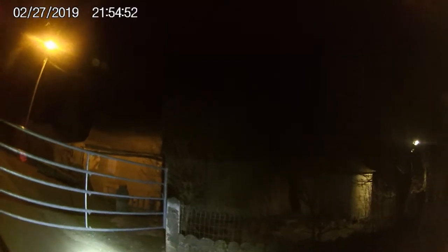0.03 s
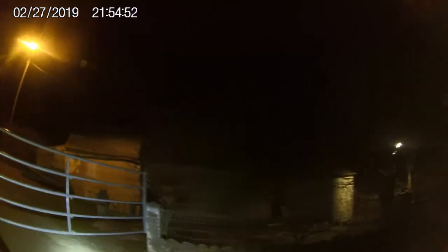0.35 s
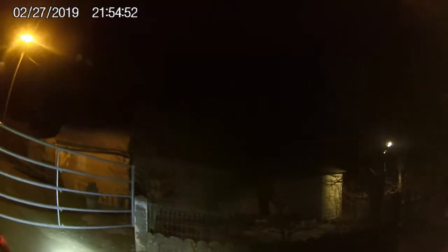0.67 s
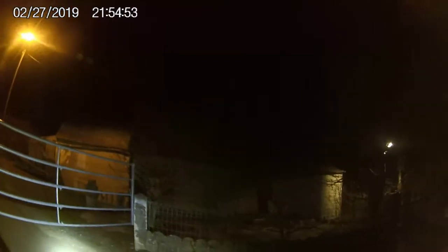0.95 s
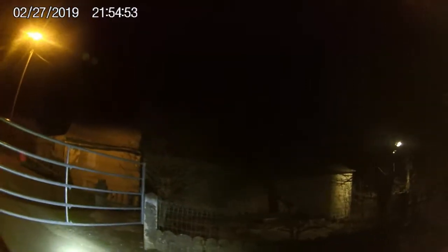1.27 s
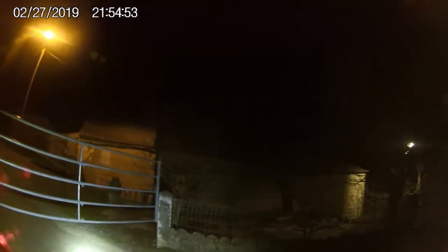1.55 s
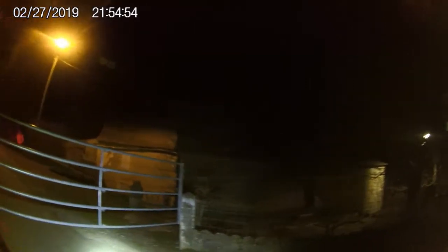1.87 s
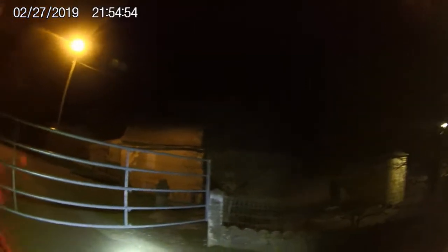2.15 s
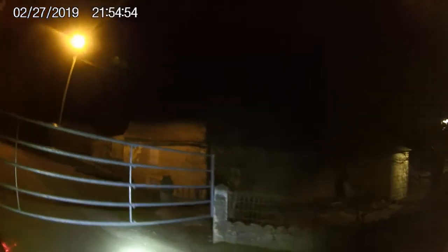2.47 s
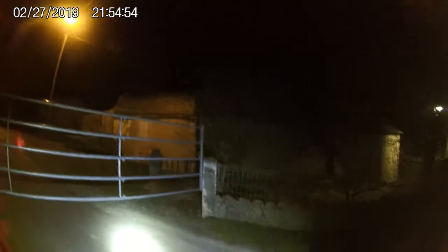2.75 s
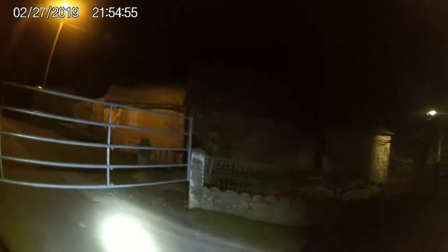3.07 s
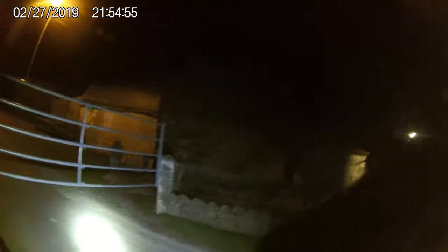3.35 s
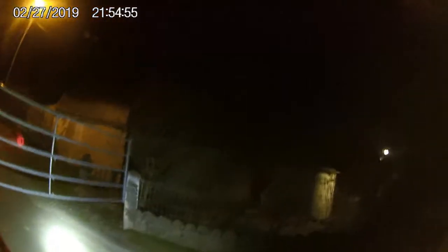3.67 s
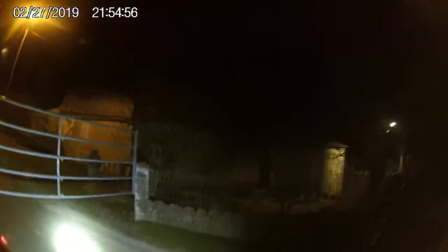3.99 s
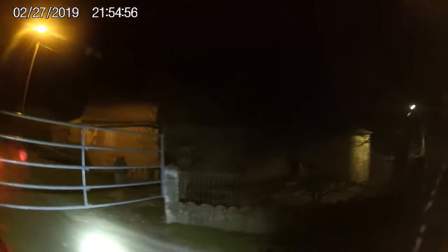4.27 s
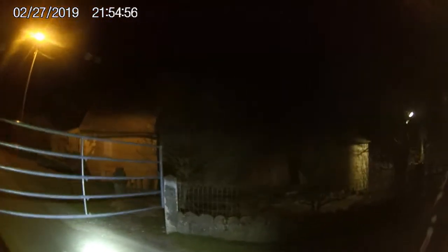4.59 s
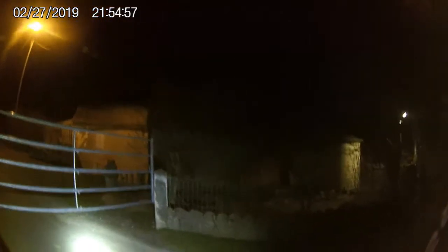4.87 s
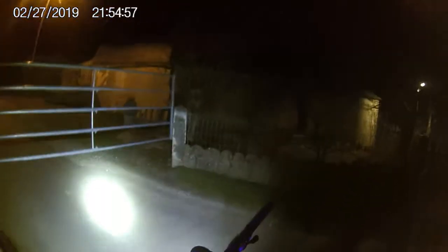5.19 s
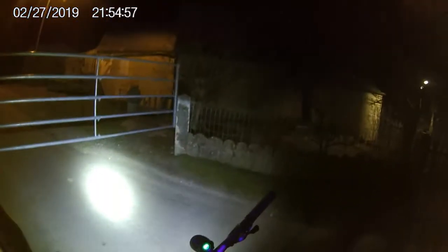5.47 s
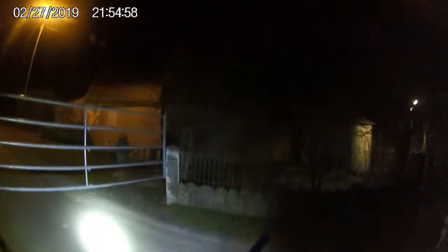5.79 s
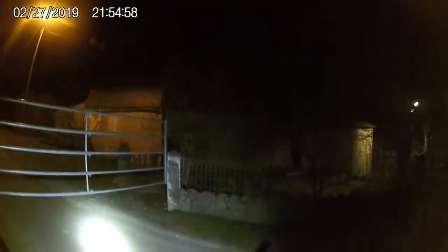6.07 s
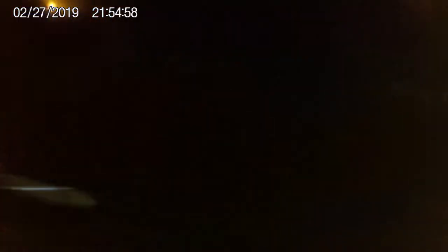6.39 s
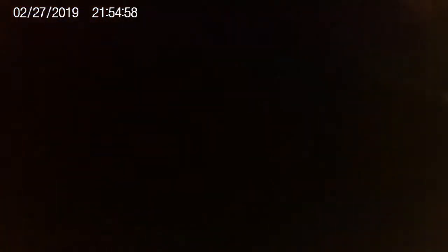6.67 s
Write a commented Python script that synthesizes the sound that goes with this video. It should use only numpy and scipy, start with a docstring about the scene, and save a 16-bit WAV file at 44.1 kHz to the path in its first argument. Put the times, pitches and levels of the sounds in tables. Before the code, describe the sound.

Fingers brush softly against a camera's plastic housing, with near quiet and faint hiss between touches. About halfway through, the handling turns much louder: uneven, boxy rubbing, clusters of sharp clicks, brief scrapes and soft thuds as the hand shifts. After a short lull come a few more clicks and a last rub. Everything reaches the microphone directly through the case, and the night outdoors stays silent.

```python
"""Outdoors on a still night, a small camera is handled. Light rustling against its case gives way to
close stick-slip rubbing, plastic clicks and a few hard scrapes as the grip shifts. The sound is
structure-borne: it reaches the microphone through the housing, which resonates near 1.3 kHz and
passes little above 4 kHz. Under it lie a faint hiss and a thin electronic whine."""
import sys
import numpy as np
from scipy import signal
from scipy.fft import rfft, irfft
from scipy.io import wavfile
from scipy.ndimage import uniform_filter1d, minimum_filter1d

SR = 44100
rng = np.random.default_rng(int(sys.argv[2]) if len(sys.argv) > 2 else 0)


def wrap_up_sound(samples):
    """Save the sound to the file named by the first command line argument, as 16-bit audio."""
    columns = np.atleast_2d(samples).T
    # keep every value between -1 and 1, then stretch to whole-number steps
    tamed = np.clip(columns, -1, 1)
    steps = np.round(tamed * 32767).astype(np.int16)
    wavfile.write(sys.argv[1], SR, steps)


N = 301644
TIME = np.arange(N) / SR

# impacts on the case: (time [s], level over 5 ms [dB], brightness [dB], bass [dB], rattle scale [s])
IMPACTS = [(0.0503, -43, 2, -46, .0004), (0.715, -52, -10, -13, .001), (2.081, -41.5, -1, -47, 0.0018),
           (2.1356, -31.5, -8, -60, 0.00017), (2.1932, -42, -4.5, -52, 0.00017),
           (2.2171, -40, -5, -53, 0.0041), (2.5877, -47, -4.5, -44, 0.00085),
           (2.6753, -35, -8, -50, 0.00014), (3.3529, -23, -3, -20.5, 0.00042),
           (3.3556, -19, -0.5, -25, 0.0007), (3.3728, -19.5, -7.5, -25, 0.00061),
           (3.428, -29, -5.5, -15.5, 0.0039), (3.5779, -29.5, 3, -22.5, 0.00038),
           (3.638, -17.5, -9.5, -13.5, 0.00056), (3.7375, -19, -9, -27.5, 0.00061),
           (3.9486, -23, -4.5, -24, 0.0008), (4.1046, -23, -9.5, -23, 0.0014),
           (4.1222, -27.5, -9.5, -20, 0.00089), (4.2073, -28.5, -7.5, -16.5, 0.001),
           (4.2843, -36.5, -12, -15.5, 0.0018), (4.4348, -22.5, -11, -23.5, 0.00047),
           (4.4415, -29.5, -7, -25.5, 0.0026), (4.5202, -34.5, 0.5, -17, 0.0022),
           (4.6381, -32, 4.5, -38, 0.01), (4.6493, -24.5, 7, -27.5, 0.00038),
           (4.6795, -16, -2.5, -21.5, 0.00085), (4.6842, -21, -7.5, -18, 0.00072),
           (4.8098, -13, -2.5, -20.5, 0.0013), (4.9489, -24.5, -10.5, -37, 0.00042),
           (5.0378, -13.5, -10.5, -38, 0.0015), (5.062, -22, 5.5, -19, 0.0015),
           (5.0664, -5.5, -4, -16, 0.0016), (5.1084, -19, -4, -23.5, 0.0008),
           (5.1695, -27, -11, -19, 0.00079), (5.194, -17, -9, -18, 0.00084),
           (5.2364, -34.5, -15, -20, 0.00039), (5.365, -40.5, 0, -30.5, 0.00074),
           (5.3832, -19, -4, -37, 0.00051), (5.5157, -22.5, -5, -19.5, 0.0021),
           (5.5669, -18.5, 7, -20, 0.00047), (5.5703, -21, -2, -14.5, 0.0012),
           (5.58, -23, -3, -29, 0.00063), (5.5922, -23, -11, -24.5, 0.0022),
           (5.6798, -19, -9.5, -20, 0.001), (5.7264, -25, -11, -14.5, 0.0011),
           (5.7512, -26.5, -6.5, -21.5, 0.00072), (5.8246, -24, 2, -28.5, 0.0011),
           (6.0963, -34.5, -8.5, -36, .0004), (6.296, -16.5, -8.5, -22, 0.0012),
           (6.629, -35, 1, -20, 0.0019), (6.66, -28.5, -9, -34, 0.001),
           (6.7224, -35.5, -0.5, -15.5, 0.0014), (6.772, -33.5, -4, -21.5, 0.0001),
           (6.7978, -16.5, -6, -31, 0.00085)]
# treble that leaks through the case: (frequency [Hz], relative level [dB])
LEAK_SPECTRUM = [(3000, -34.5), (5000, -2.5), (6100, -14.5), (7200, -10.5), (8000, -21.5), (9200, -8),
                 (11200, -0.5), (12500, -5.5), (13300, -16), (14600, -6), (16000, -18.5)]


def amp(db):
    """Amplitude ratio of a level in decibels."""
    return 10 ** (np.asarray(db) / 20)


def unit(x):
    """Normalisation to rms 1."""
    return x / np.sqrt(np.mean(x ** 2) + 1e-20)


def add(mix, time_s, sound):
    """Superposition: a sound joins the mix at the given time."""
    part = mix[max(round(time_s * SR), 0):][:len(sound)]
    part += sound[:len(part)]


def wander(cutoff_hz):
    """Random modulation: low-passed Gaussian noise of rms 1."""
    spectrum = rfft(rng.standard_normal(N))
    return unit(irfft(spectrum / (1 + (np.fft.rfftfreq(N, 1 / SR) / cutoff_hz) ** 4), N))


def impulse_response(spectrum, weight=lambda hz: 1, size=2048):
    """Minimum-phase response of energy 1: the Hilbert transform gives phase from log magnitude."""
    hz = abs(np.fft.fftfreq(size, 1 / SR)) + 1
    points_hz, points_db = np.transpose(spectrum)
    gain = amp(np.interp(np.log(hz), np.log(points_hz), points_db)) * weight(hz)
    gain /= np.sqrt(1 + (hz / points_hz[-1]) ** 20)
    log_gain = np.log(np.maximum(gain / gain.max(), 1e-5))
    transfer = np.exp(np.conj(signal.hilbert(log_gain)))
    response = np.fft.ifft(transfer).real[:size // 2]
    return response / np.linalg.norm(response)


def housing(spectrum, tilt=0, flex_hz=470, panel_hz=1020, wall_hz=2050):
    """Structure-borne transmission in four bands: slow flexing, broad panels, air cavity, stiff walls."""
    below = lambda hz, edge: 1 / np.sqrt(1 + (hz / edge) ** 12)
    flex = lambda hz: below(hz, flex_hz)
    panel = lambda hz: below(flex_hz, hz) * below(hz, panel_hz) ** 2
    cavity = lambda hz: below(panel_hz, hz) * below(hz, wall_hz)
    walls = lambda hz: below(wall_hz, hz) * np.clip(hz / wall_hz, 1, 2) ** tilt
    return [impulse_response(spectrum, band) for band in (flex, panel, cavity, walls)]


def transmit(drive, response):
    """Linear filtering: a drive convolved with an impulse response, brought to rms 1."""
    return unit(signal.oaconvolve(drive, response)[:N])


def hiss_and_whine(hiss_db=-62, whine_db=-87.5, whine_hz=10020, waver_hz=35):
    """Noise floor: hiss coloured by the housing, and a frequency-modulated electronic tone."""
    # steady hiss: (frequency [Hz], relative level [dB])
    hiss_spectrum = [(30, -23.5), (400, -23.5), (1000, -11.5), (1300, 0.5), (1600, -3), (2950, -4),
                     (3600, -13), (5100, -28.5), (6000, -48.5), (8300, -43), (9600, -32.5), (11500, -32),
                     (14500, -31.5), (16000, -43)]
    pitch_hz = whine_hz + waver_hz * wander(70)
    whine = np.sqrt(2) * np.sin(2 * np.pi * np.cumsum(pitch_hz) / SR)
    hiss = transmit(rng.standard_normal(N), impulse_response(hiss_spectrum))
    return amp(hiss_db) * hiss + amp(whine_db) * whine


def thuds(half_width_cycles=0.38):
    """Elastic flexure: a push bends the case in and lets it back, in little more than one low cycle."""
    # soft pushes: (centre time [s], peak level [dB], frequency [Hz])
    pushes = [(.04, -56, 240), (.134, -54, 200), (3.359, -33.5, 82), (4.112, -41.5, 126),
              (4.728, -40.5, 133), (4.814, -41.5, 80.4), (5.071, -28, 171), (5.542, -48, 159),
              (6.477, -44.5, 132)]
    out, t = np.zeros(N), np.arange(-.025, .025, 1 / SR)
    for centre, db, hz in pushes:
        envelope = np.exp(-(t * hz / half_width_cycles) ** 2)
        add(out, centre + t[0], -amp(db) * np.cos(2 * np.pi * hz * t) * envelope)
    return out


def squeaks(jitter=0.082):
    """Stick-slip oscillation: plastic slips almost periodically for a few milliseconds."""
    # squeaks: (centre time [s], peak level [dB], frequency [Hz], half width [s])
    bursts = [(3.3606, -20.5, 2980, 0.0038), (3.361, -26, 4130, 0.001), (3.37, -34, 4120, 0.002),
              (5.0643, -11, 3830, 0.0028)]
    out = np.zeros(N)
    uneven_time = np.cumsum(1 + jitter * wander(590)) / SR
    for centre, db, hz, half_width in bursts:
        envelope = np.exp(-((TIME - centre) / half_width) ** 2)
        out += amp(db) * np.sin(2 * np.pi * hz * uneven_time) * envelope
    return out


def scrapes():
    """Broadband friction: very fast slips of hard edges bite at once, ease off and leak in as treble."""
    # scraping edges: (time [s], initial level [dB], decay time [s])
    edges = [(3.359, -44, 0.0023), (3.369, -47, 0.0025), (4.646, -58.5, 0.0064), (4.683, -57, .0018),
             (4.8113, -45.5, 0.0016), (5.02, -71, .014), (5.064, -34.5, 0.0045), (5.5664, -54.5, 0.0046),
             (6.057, -78, .033), (6.214, -78.5, .14), (6.638, -52, 0.0019)]
    force = np.zeros(N)
    for start, db, decay in edges:
        age = np.arange(0, 2, 1 / max(decay * SR, 8))  # in decay times
        add(force, start, amp(db) * rng.standard_normal(len(age)) * np.exp(-age ** 2))
    return signal.oaconvolve(force, impulse_response(LEAK_SPECTRUM))[:N]


def contact(ease_s=0.024, stroke_skew=0.79, slide_db=-24.5, rise_s=0.0055, fall_s=0.012):
    """Incoherent sources add in power: the rubbing's level, brightness and bass over time, in dB."""
    # the hand rests on the case and drags lightly: (start [s], end [s])
    holds = [(3.348, 5.13), (5.57, 5.75), (6.05, 6.68)]
    # strokes across the case: (start [s], duration [s], level [dB], brightness [dB], bass [dB])
    strokes = [(-0.06, 0.31, -53.5, 0, -14.5), (0.273, 0.19, -53.5, -6, -17), (0.445, 0.21, -59, -3, -24),
               (1.55, 0.69, -54.5, -5, -18.5), (1.73, .12, -52.5, -9, -24), (1.862, 0.2, -39.5, -7, -25.5),
               (2.037, 0.23, -54, 4, -32), (2.267, 0.21, -42, -2, -22), (2.597, 0.2, -49, 1.5, -49),
               (2.813, 0.26, -55.5, 0, -22), (3.114, 0.2, -55, 0, -18), (3.438, 0.26, -34.5, 1.5, -29),
               (3.671, 0.14, -42, -1.5, -22.5), (3.802, 0.1, -42, -3, -24.5), (3.918, 0.18, -38, -3.5, -28),
               (4.075, 0.18, -36.5, -2.5, -32), (4.22, 0.66, -46, -31, -22.5),
               (4.472, 0.087, -42, 4.5, -21), (4.706, 0.3, -48.5, -13, -11), (4.952, 0.22, -36, 4.5, -27),
               (5.013, 0.023, -27.5, -1.5, -11), (5.167, 0.11, -40.5, -1.5, -23.5),
               (5.245, 0.15, -59, -1.5, -18), (5.56, .13, -49, 3.5, -19), (5.75, 0.17, -43.5, 1, -31.5),
               (5.892, .1, -46.5, 3, -30), (5.97, 0.16, -57, -3, -29), (6.051, 0.067, -39, 0.5, -33),
               (6.11, 0.076, -49, 1, -33), (6.2, 0.34, -43, -1.5, -38), (6.265, 0.14, -37, -1, -41.5),
               (6.51, .16, -44.5, 3, -14), (6.687, 0.16, -58, -6, -11), (6.807, 0.16, -26, -1, -40)]
    band_power = lambda db, bright, bass: amp([[db], [db + bright], [db + bass]]) ** 2
    brushing = band_power(db=-71, bright=-0.5, bass=-15.5)  # faint and unbroken
    held = sum((TIME > start) & (TIME < end) for start, end in holds).astype(float)
    held = uniform_filter1d(held, round(ease_s * SR))
    power = brushing + band_power(db=-50, bright=-0.5, bass=-22) * held ** 2
    for start, duration, db, bright, bass in strokes:
        during = (TIME > start) & (TIME < start + duration)
        progress = (TIME[during] - start) / duration
        arch = abs(np.sin(np.pi * progress ** stroke_skew)) ** 0.99  # peaks a little early
        power[:, during] += band_power(db, bright, bass) * arch ** 2
    for time_s, db, bright, _, _ in IMPACTS:  # the grip slides briefly around each knock
        near = (TIME > time_s - 2 * rise_s) & (TIME < time_s + 2 * fall_s)
        age = (TIME[near] - time_s) / np.where(TIME[near] < time_s, rise_s, fall_s)
        power[:, near] += band_power(db + slide_db, bright, bass=-16) * np.exp(-2 * age ** 2)
    level, treble, low = 10 * np.log10(power)
    return level, treble - level, low - level


def friction(slips_per_s, spread_db, drag, judder_db):
    """Stick-slip friction: tiny uneven slips over a smooth drag, swelling as the contact judders."""
    sizes = amp(spread_db * np.minimum(rng.exponential(1, N), 4)) * rng.choice([-1, 1], N)
    slips = unit(sizes * (rng.random(N) < slips_per_s / SR))
    return (slips + drag * rng.standard_normal(N)) * amp(judder_db * wander(44))


def rubbing(level, bright, bass, grip_s=3.32, leak_db=-44):
    """Forced vibration: friction drives the case, in a light rustle and, once gripped, a firm rub."""
    # the housing under a light touch: (frequency [Hz], relative level [dB])
    rustle_spectrum = [(30, -36.5), (250, -22), (480, -31), (780, -4), (1050, -15), (1300, 10), (1600, 6),
                       (2150, -13.5), (2550, -15), (2900, -10.5), (3250, -21.5), (3600, -17), (3950, -36.5),
                       (5800, -65)]
    # the housing under a firm grip: (frequency [Hz], relative level [dB])
    rub_spectrum = [(30, -27.5), (430, -33), (680, -16.5), (1020, -16), (1320, 7), (1600, 0.5), (1900, 3),
                    (2500, -7.5), (2950, -6.5), (3300, -15), (3600, -15.5), (4400, -33), (5200, -44),
                    (6100, -63.5)]
    uneven_db = 2.1 * wander(65)  # the case flexes unevenly
    flex_db, panel_db = bass - 4 + uneven_db, 0.41 * bass - 10.5 + uneven_db
    bands_db = flex_db, panel_db, 1.3, bright
    light = friction(slips_per_s=500, spread_db=2.0, drag=1.21, judder_db=3.0)
    firm = friction(slips_per_s=900, spread_db=4.0, drag=0.96, judder_db=2.0)
    out = np.zeros(N)
    for db, soft, hard in zip(bands_db, housing(rustle_spectrum), housing(rub_spectrum)):
        out += amp(level + db) * np.where(TIME < grip_s, transmit(light, soft), transmit(firm, hard))
    return out + amp(level + bright + leak_db) * transmit(firm, impulse_response(LEAK_SPECTRUM))


def ticks(rub_db, count=50, offset_db=-0.5, spread_db=6, bright_db=-9, bass_db=-22.5, rattle_s=0.0013):
    """Frictional catching: rows of small random impacts, about as strong as the rubbing behind them."""
    rows = []
    for position, size in rng.random((count, 2)):
        sample = position * (N - 1)
        level = rub_db[int(sample)] + offset_db + spread_db * (2 * size - 1)
        rows.append((sample / SR, level, bright_db, bass_db, rattle_s))
    return rows


def knocks(impacts, rattle_gain=1.51, hardening=0.081):
    """Impact excitation: a sharp contact and a short rattle set the case's damped modes ringing."""
    # the housing when struck: (frequency [Hz], relative level [dB])
    knock_spectrum = [(30, -32), (250, -22), (400, -26), (720, -10.5), (1000, -13), (1350, 1.5), (1720, -3),
                      (2150, -8.5), (2900, -4.5), (3250, -16.5), (3750, -19.5), (4400, -38.5), (5100, -42),
                      (5800, -60)]
    # modes of the case: (frequency [Hz], relative level [dB], time to fall 60 dB [s])
    case_modes = [(1326, -44, 0.028), (1418, -40, 0.019), (1748, -39.5, 0.022)]
    level_span = round(.005 * SR)
    out, t = np.zeros(N), np.arange(2048) / SR
    for time_s, level, bright, bass, rattle_s in impacts:
        # a harder contact reaches higher into the walls' range
        flex, panel, cavity, walls = housing(knock_spectrum, tilt=hardening * (bright + 4))
        chatter = rng.standard_normal(len(t)) * (rng.random(len(t)) < .25)
        envelope = np.exp(-(t / (2.58 * rattle_s)) ** 4)
        force = rattle_gain * np.sqrt(rattle_s / 0.0065) * chatter * envelope
        force[0] = 1  # the first contact
        shift_hz = rng.uniform(-89.6, 65.6)  # the grip detunes the modes
        modes = sum(amp(db - 60 * t / t60) * np.cos(2 * np.pi * (hz + shift_hz) * t)
                    for hz, db, t60 in case_modes)
        ringing = signal.fftconvolve(cavity, modes)
        ringing[:len(cavity)] += cavity
        # a light tick leaves the panels nearly still; a heavy knock sets them going
        for response, db in (flex, bass - 4.5), (panel, 0.95 * bass + 3), (ringing, 0.07), (walls, bright):
            band = signal.fftconvolve(force, response)
            add(out, time_s, amp(level + db) * band * np.sqrt(level_span / np.sum(band ** 2)))
    return out


def scene():
    """Superposition of all sources at the one microphone inside the case."""
    level, bright, bass = contact()
    touch = rubbing(level, bright, bass) + knocks(IMPACTS + ticks(level))
    return (touch + scrapes() + squeaks() + thuds() + hiss_and_whine())[None]


def record(dry, ceiling=0.78, smooth_samples=90, cutoff_hz=15850):
    """Peak and band limiting: a fast, smooth gain holds the hardest knocks down; a low-pass follows."""
    gain = minimum_filter1d(ceiling / np.maximum(abs(dry), ceiling), 2 * smooth_samples)
    gain = uniform_filter1d(uniform_filter1d(gain, smooth_samples), smooth_samples)
    low_pass = signal.firwin(511, cutoff_hz, window=("kaiser", 9), fs=SR)
    return signal.oaconvolve(dry * gain, low_pass[None], "same")


dry = scene()
out = record(dry)
wrap_up_sound(out)
```